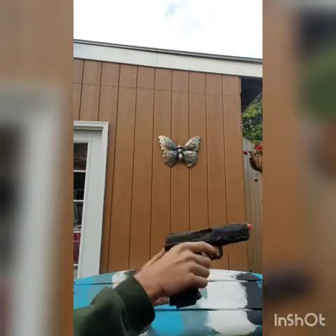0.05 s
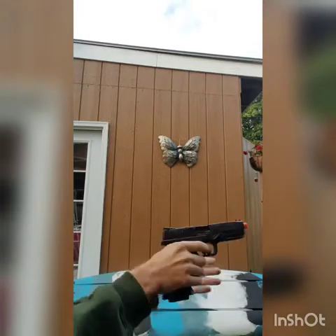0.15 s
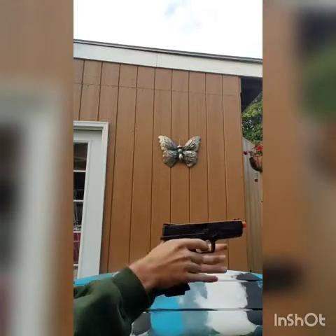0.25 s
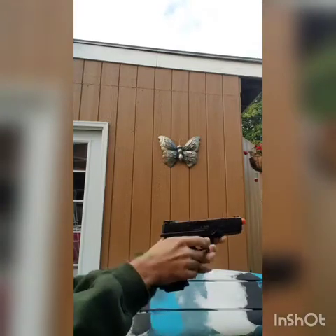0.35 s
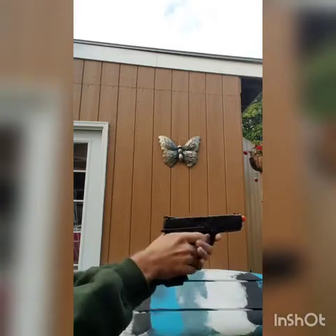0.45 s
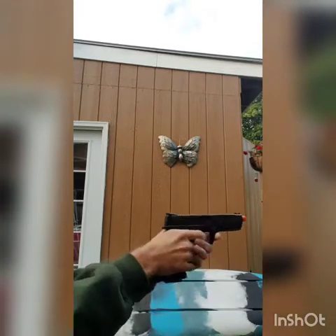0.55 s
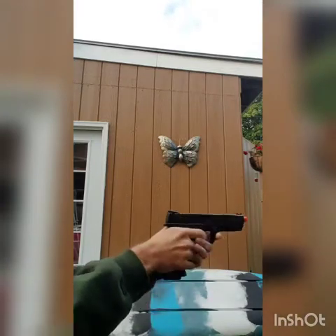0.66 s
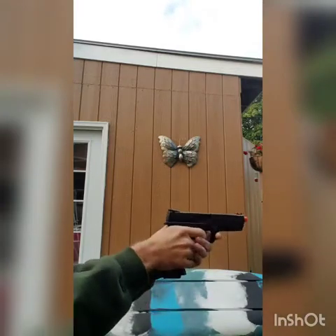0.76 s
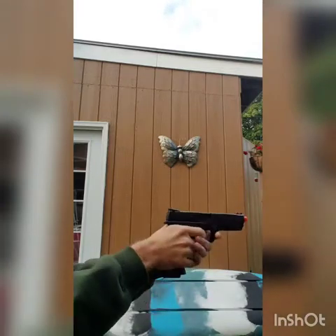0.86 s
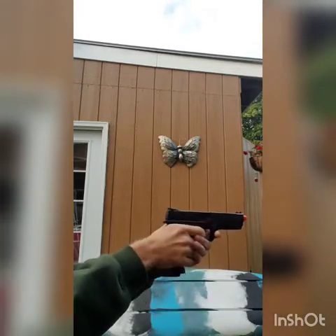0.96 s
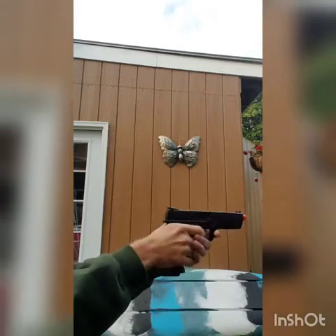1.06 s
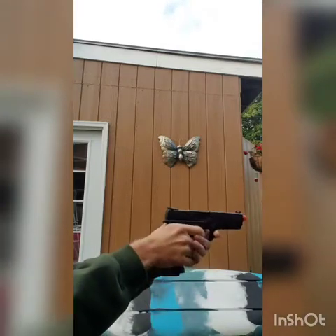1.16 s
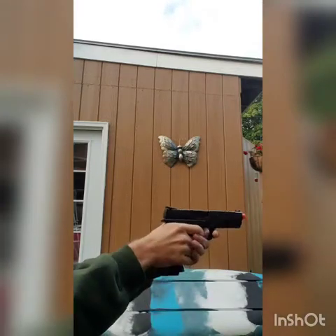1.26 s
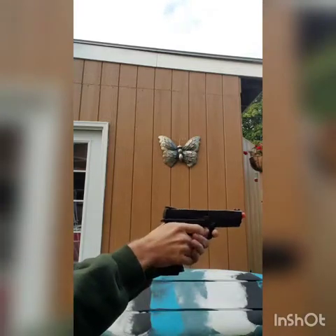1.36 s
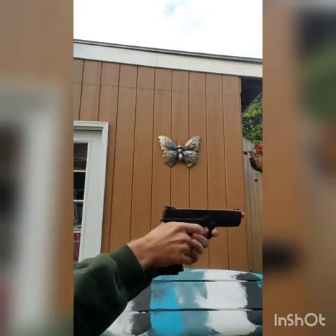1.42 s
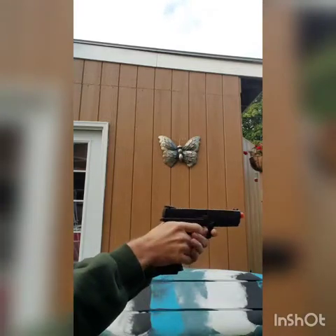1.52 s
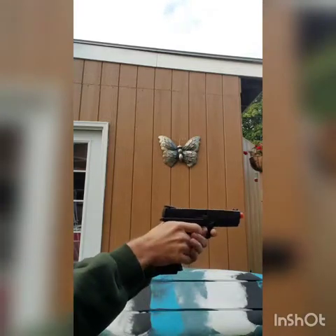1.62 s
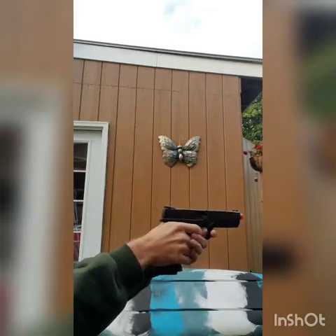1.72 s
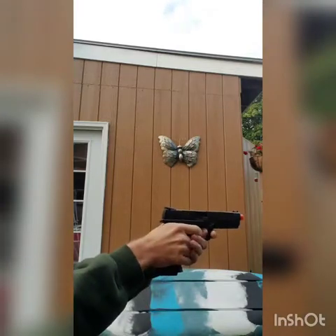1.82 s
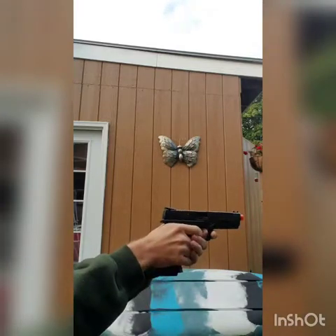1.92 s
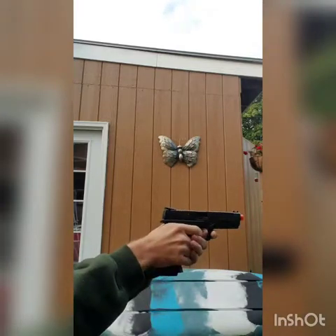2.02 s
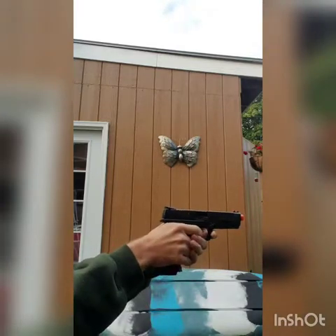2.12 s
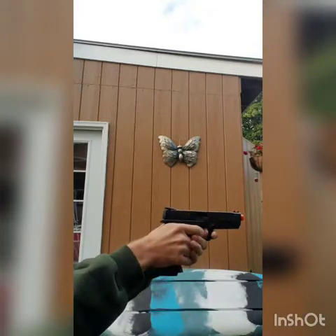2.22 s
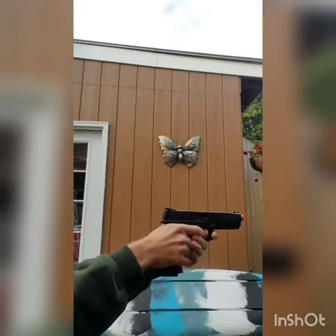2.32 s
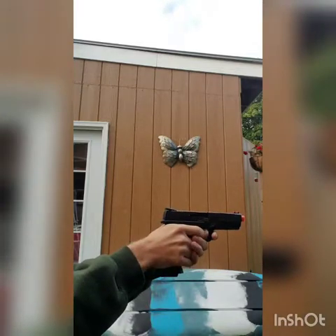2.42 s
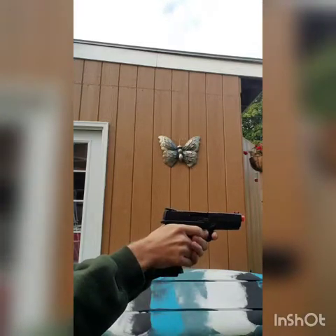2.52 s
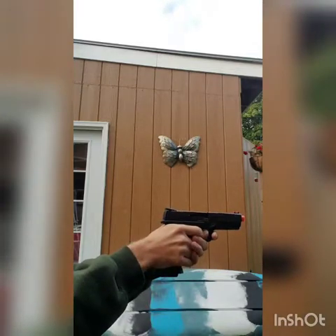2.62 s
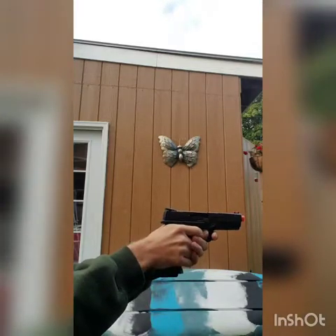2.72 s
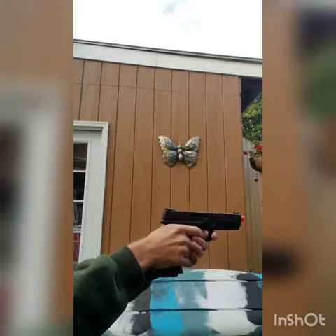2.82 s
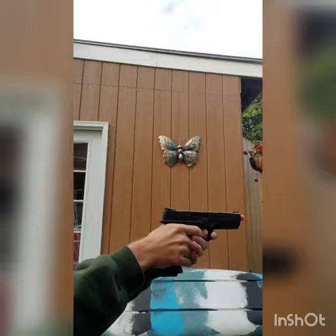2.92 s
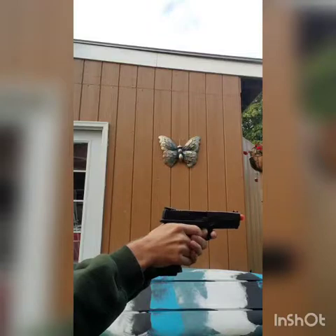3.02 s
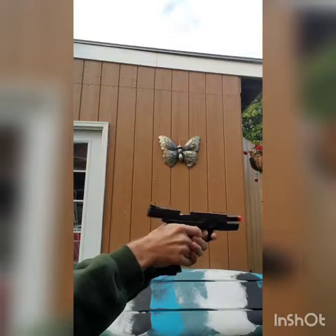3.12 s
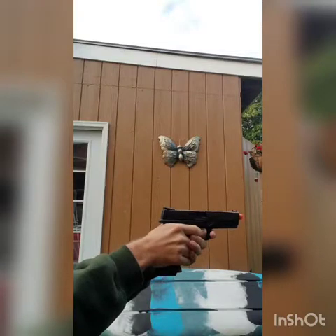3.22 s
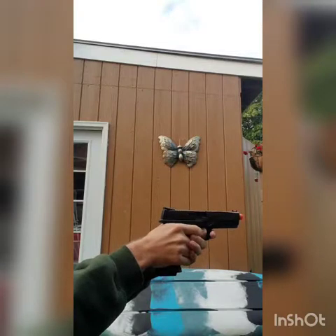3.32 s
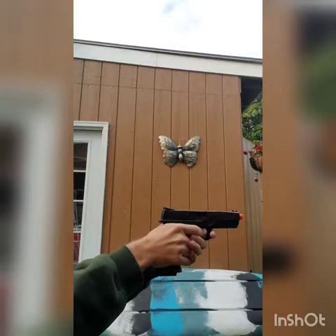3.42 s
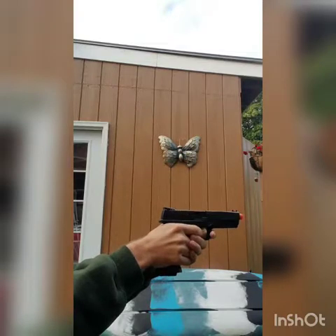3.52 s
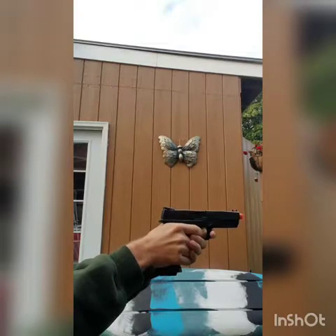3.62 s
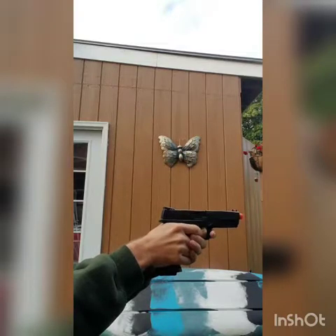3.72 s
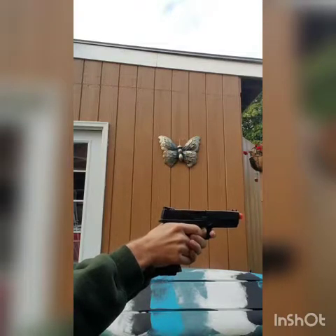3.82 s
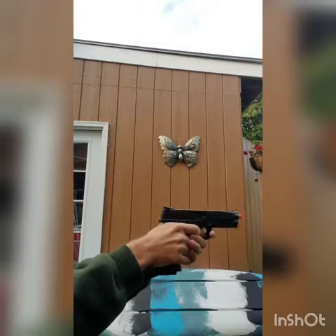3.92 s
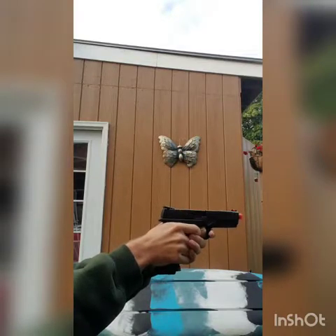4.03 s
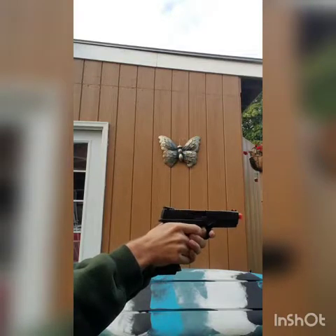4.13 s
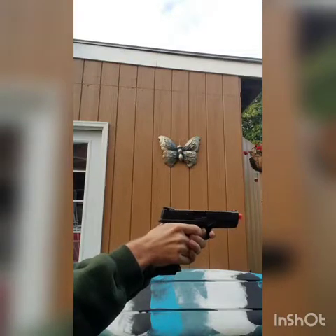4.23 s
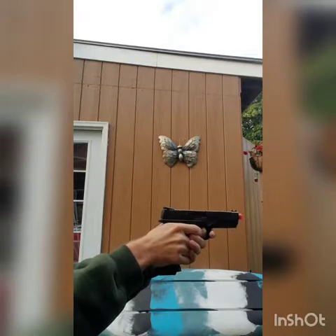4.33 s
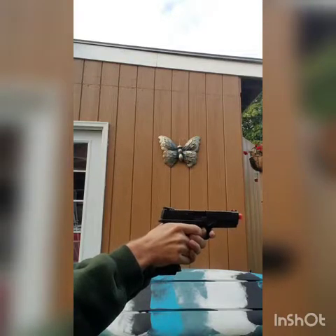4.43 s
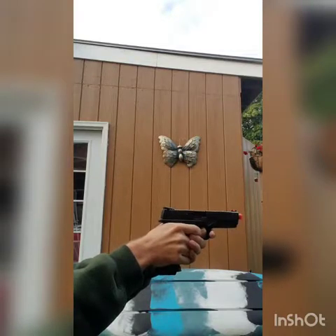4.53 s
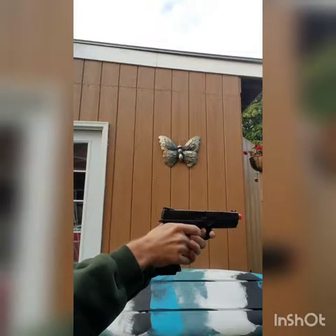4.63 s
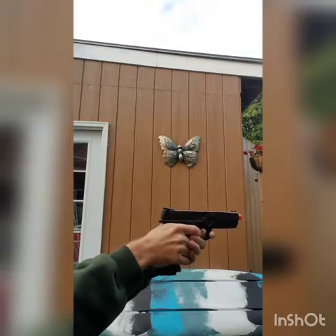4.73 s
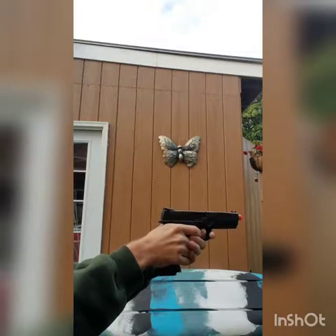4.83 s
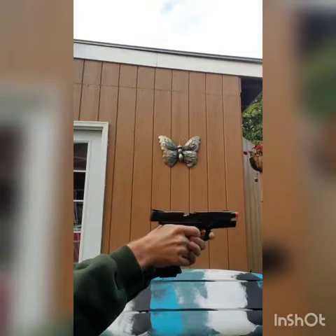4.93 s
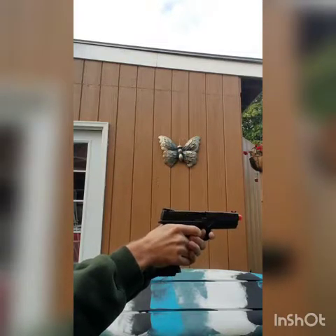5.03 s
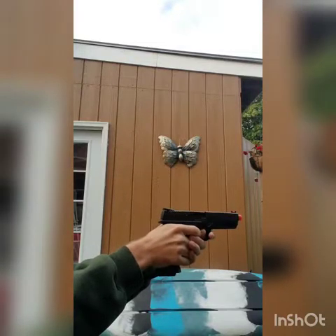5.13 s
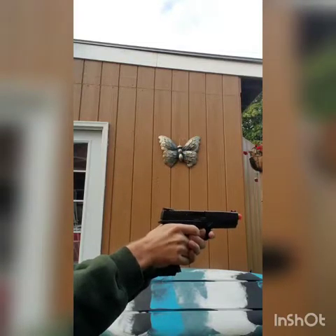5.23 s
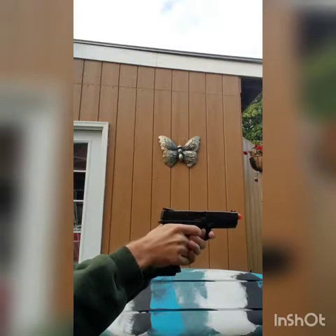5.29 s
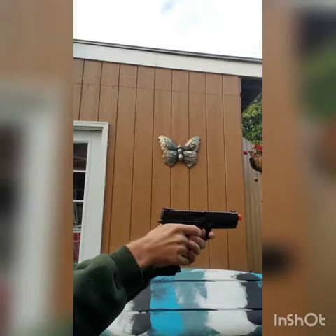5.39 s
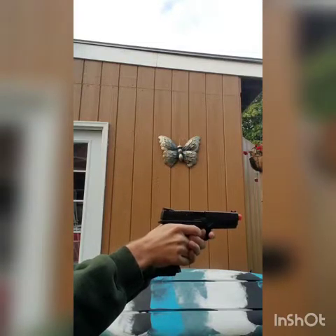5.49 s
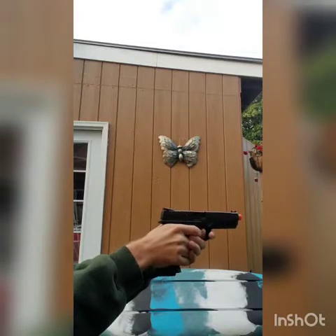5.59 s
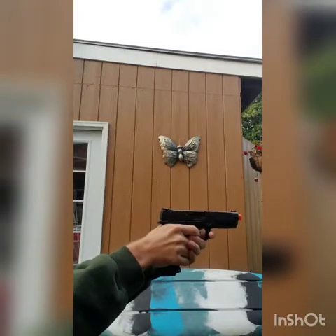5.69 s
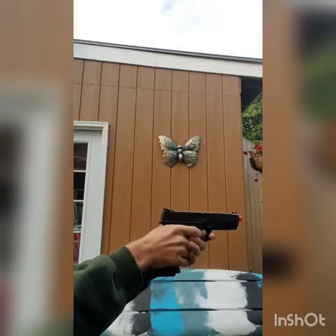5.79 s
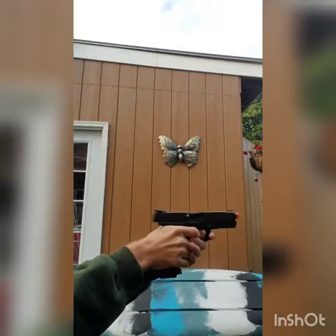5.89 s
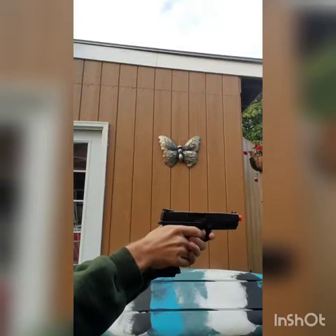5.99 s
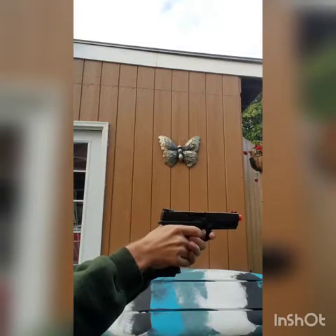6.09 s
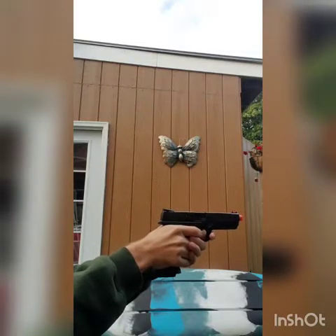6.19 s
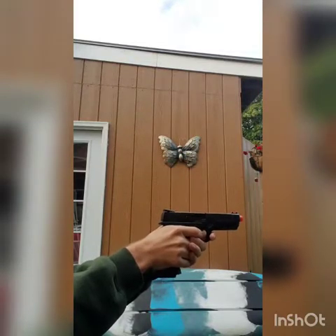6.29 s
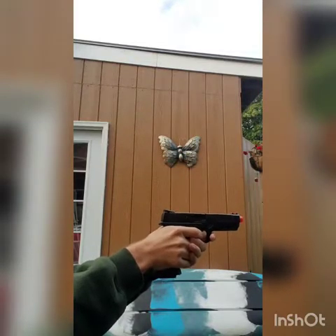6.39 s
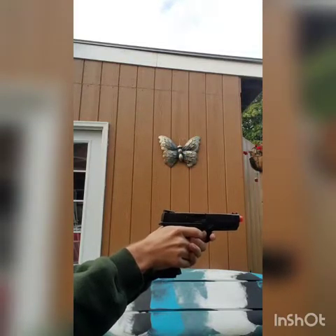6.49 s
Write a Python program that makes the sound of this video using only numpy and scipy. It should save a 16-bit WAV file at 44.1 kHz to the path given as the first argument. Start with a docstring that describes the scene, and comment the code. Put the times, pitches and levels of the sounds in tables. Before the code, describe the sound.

Eight snappy pops of a gas-powered toy pistol, its slide slamming after each, with dry trigger clicks, chirps and a low hum in a yard.

```python
"""A yard beside the wooden wall of a house, where a gas blowback airsoft pistol fires eight shots close by.
Each shot is a valve pop, the slide knocking back, a hiss of spent gas and the slide slamming shut:
shaped noise bursts, filters and damped modes. The trigger clicks between shots; pellets tick down range.
Scattered reflections give a short tail, a far wall one echo; behind are far rush, a low hum and small birds.
A gain control pushes this background down at every shot and lets it swell back."""
import sys
import numpy as np
from scipy import signal
from scipy.fft import rfft, irfft
from scipy.io import wavfile
from scipy.ndimage import uniform_filter1d, minimum_filter1d

SR = 44100
rng = np.random.default_rng(int(sys.argv[2]) if len(sys.argv) > 2 else 0)


def dump_mix(stems):
    """Bounce the given channels to the path in sys.argv[1] as a 16-bit WAV at rate SR."""
    frames = np.atleast_2d(stems).T  # one column per channel
    limited = np.clip(frames, -1, 1)  # hard clip at full scale
    pcm = np.round(limited * 32767).astype(np.int16)
    wavfile.write(sys.argv[1], SR, pcm)


N = 288855
T = np.arange(N) / SR

# All table levels are relative: later gains and filters set the final level.


def from_db(db):
    """Logarithmic level: decibels to amplitude gain."""
    return 10 ** (np.asarray(db) / 20)


def level_curve(rows):
    """Linear interpolation in decibels: the gain at every sample."""
    times, levels_db = np.transpose(rows)
    return from_db(np.interp(T, times, levels_db))


def at_hz(points, hz):
    """Logarithmic frequency scale: read a table along it."""
    known_hz, values = np.transpose(points)
    return np.interp(np.log(np.maximum(hz, 1)), np.log(known_hz), values)


def convolve(x, response):
    """Linear superposition: pass both channels through an impulse response."""
    return signal.oaconvolve(x, np.atleast_2d(response), axes=1)[:, :N]


def colour(x, spectrum, size=4096):
    """Minimum-phase filtering: causal colour that keeps the power of white noise."""
    hz = np.arange(size // 2 + 1) * SR / size
    cepstrum = irfft(np.log(from_db(at_hz(spectrum, hz))))
    # folding the cepstrum onto positive time makes the response causal
    response = irfft(np.exp(rfft(2 * cepstrum[:size // 2], size)))
    return convolve(x, response / np.linalg.norm(response))


def resonate(x, modes, size=4096):
    """Modal superposition: damped modes in parallel, keeping the power of white noise."""
    t = T[:size]
    response = np.zeros(size)
    for hz, width, db in modes:
        decay = np.exp(-np.pi * width * t)
        response += from_db(db) * width * decay * np.cos(2 * np.pi * hz * t)
    return convolve(x, response / np.linalg.norm(response))


def stereo_noise(alike):
    """Interchannel correlation: white noise with a given likeness of left and right."""
    mid, side = rng.standard_normal((2, N))
    alike = np.clip(alike, -1, 1)
    return np.sqrt((1 + alike) / 2) * mid + np.sqrt((1 - alike) / 2) * np.array([side, -side])


def bursts(hits, t60, rise=0.00013, hold=0., size=12000):
    """Exponential decay: blows (s, dB) swell, hold and die away; their powers sum."""
    power, t = np.zeros(N + size), T[:size]
    shape = (1 - np.exp(-t / rise)) * from_db(-60 * np.maximum(t - hold, 0) / t60)
    for s, db in hits:
        start = round(s * SR)
        power[start:start + size] += (from_db(db) * shape) ** 2
    return np.sqrt(power[:N])


def chatter(alike, spread_db, size=12):
    """Rough contact: metal parts touch in a rush of tiny contacts of uneven size."""
    steps = np.clip(rng.standard_normal(N // size + 1), -2, 2)
    sizes = np.repeat(from_db(spread_db * steps), size)[:N]
    return stereo_noise(alike) * sizes / np.sqrt(np.mean(sizes ** 2))


def taps(hits):
    """Impulsive excitation: one hard contact for each blow (s, dB)."""
    out = np.zeros((2, N))
    for s, db in hits:
        out[:, round(s * SR)] += from_db(db)
    return out


# far outdoor rush: (time [s], level [dB])
RUSH_LEVEL = [(0, -60.5), (.6, -55), (1.1, -54.5), (1.6, -57), (2.6, -52.5), (4.7, -52), (6.55, -54.5)]
# spectrum of the rush: (frequency [Hz], spectral density [dB])
RUSH_SPECTRUM = [(15, -45.5), (25, -17), (111, -8.5), (161, -13.5), (223, -9), (256, -10.5), (439, -6),
                 (911, -7), (2410, -20.5), (3520, -25), (4250, -26.5), (6920, -34), (14800, -37.5),
                 (16000, -38)]
# machine hum: (time [s], level [dB])
HUM_LEVEL = [(0, -59.5), (.55, -60), (1.1, -69), (2.4, -64.5), (2.9, -74), (3.6, -60.5), (4.5, -62),
             (5.4, -75), (6.55, -82)]
# low rumble while the grip is settled: (time [s], level [dB])
RUMBLE_LEVEL = [(0, -60), (.3, -55.5), (.6, -62.5), (1.3, -71), (6.55, -85)]
# spectrum of the rumble: (frequency [Hz], spectral density [dB])
RUMBLE_SPECTRUM = [(20, -12.5), (50, -8), (85, -1.5), (140, -8), (280, -16), (900, -40), (4000, -71.5)]
HUM_HZ = 114.8


def background():
    """Stationary noise and a harmonic tone: outdoor rush, machine hum with its octave, low rumble."""
    rush = level_curve(RUSH_LEVEL) * colour(stereo_noise(alike=0.84), RUSH_SPECTRUM)
    phase = 2 * np.pi * HUM_HZ * T
    tone = np.sin(phase) + from_db(-10) * np.sin(2 * phase)
    hum = level_curve(HUM_LEVEL) * np.sqrt(2) * tone
    rumble = level_curve(RUMBLE_LEVEL) * colour(stereo_noise(alike=0.87), RUMBLE_SPECTRUM)
    balance_db = np.array([[-.8], [.8]])  # left, right
    return (rush + hum + rumble) * from_db(balance_db)


# spectrum of the yard's tail: (frequency [Hz], level [dB])
YARD_SPECTRUM = [(60, -5), (400, -2), (800, -2), (1700, 1.5), (2080, 5), (2350, 0.5), (2900, 2.5),
                 (4000, 0.5), (8000, 2), (11000, -1.5), (16000, -8)]
# decay of the yard: (frequency [Hz], 60 dB decay time [s])
YARD_DECAY = [(100, .42), (500, 0.56), (2000, 0.56), (5000, .5), (10000, 0.41), (16000, .36)]


def yard(x, wet_db, onset, size=40000):
    """Diffuse reverberation: scattered echoes arrive in clumps and die band by band."""
    t, hz = T[:size], np.arange(size // 2 + 1) * SR / size
    clumps = np.repeat(from_db(2.5 * np.clip(rng.standard_normal(size // 200), -2, 2)), 200)
    white = rfft(rng.standard_normal((2, size)) * clumps) / np.sqrt(SR)
    response = 0
    for k, (_, t60) in enumerate(YARD_DECAY):
        # each band crossfades into its neighbours
        share = at_hz([(row[0], j == k) for j, row in enumerate(YARD_DECAY)], hz)
        response = response + irfft(white * share) * from_db(-60 * t / t60)
    swell = 1 - np.exp(-(t / onset) ** 2)
    return from_db(wet_db) * colour(convolve(x, response * swell), YARD_SPECTRUM)


# colour of the echo from a far wall: (frequency [Hz], level [dB])
FAR_WALL_SPECTRUM = [(100, -10), (600, -8), (2000, 2.5), (3500, 2.5), (7000, 0), (16000, -4)]


def far_echo(x, delay_s, echo_db, smear_t60, size=12000):
    """Delayed reflection: a wall across the yard sends back one slightly smeared copy."""
    response = bursts([(delay_s, 0)], smear_t60)[:size] * rng.standard_normal((2, size))
    echo = convolve(x, response / np.linalg.norm(response[0]))
    return from_db(echo_db) * colour(echo, FAR_WALL_SPECTRUM)


# reflections from the arm, the barrel and the wall: (left delay [s], right delay [s], level [dB])
NEAR_REFLECTIONS = [(.00152, .00159, -18), (.0046, .0037, -17.5)]


def near_echoes(x):
    """Early reflection: close surfaces return the sound at a different moment to each side."""
    out = x.copy()
    for left_s, right_s, db in NEAR_REFLECTIONS:
        left = np.interp(T - left_s, T, x[0], left=0)
        right = np.interp(T - right_s, T, x[1], left=0)
        out += from_db(db) * np.array([left, right])
    return out


def bird_notes(notes, length_s, fall, arch, waver_hz, count=24):
    """Frequency modulation: thin notes swell and fade while their pitch falls or arches."""
    out, turn = np.zeros((2, N)), np.linspace(0, np.pi, round(length_s * SR))
    contour = 1 - fall * (1 - np.cos(turn)) / 2 + arch * np.sin(turn)
    for s, start_hz, db in notes:
        waver = np.interp(turn, np.linspace(0, np.pi, count), rng.standard_normal(count))
        hz, start = start_hz * contour + waver_hz * waver, round(s * SR)
        note = np.sin(turn) * np.sin(2 * np.pi * np.cumsum(hz) / SR)
        out[:, start:start + len(turn)] += from_db(db) * note
    return out


# falling chirps, all of one shape: (time [s], start frequency [Hz], level [dB])
FALLING_CHIRPS = [(.464, 4950, -63), (.478, 6100, -69), (.612, 4600, -59.5), (.757, 4600, -58),
                  (1.64, 6600, -71), (2.26, 4620, -58), (2.39, 4620, -60), (3.615, 4600, -62.5),
                  (3.786, 4450, -62), (4.552, 4450, -60.5), (4.745, 4600, -63.5)]
# level whistles, slightly arched: (time [s], frequency [Hz], level [dB])
LEVEL_WHISTLES = [(.1, 3640, -71), (2.335, 3420, -60), (2.74, 1330, -52), (2.9, 4220, -61),
                  (2.925, 4965, -68), (3.495, 3595, -59.5), (4.695, 4960, -61.5)]
CHIRP_S, CHIRP_FALL = .066, .24   # length; share of the pitch lost
WHISTLE_S, WHISTLE_ARCH = 0.078, 0.011   # length; share of the pitch gained in the middle


def bird():
    """Tonal glides in reverberation: falling chirps and level whistles, blurred by the yard."""
    chirps = bird_notes(FALLING_CHIRPS, CHIRP_S, fall=CHIRP_FALL, arch=0, waver_hz=70)
    whistles = bird_notes(LEVEL_WHISTLES, WHISTLE_S, fall=0, arch=WHISTLE_ARCH, waver_hz=60)
    song = chirps + whistles
    return song + yard(song, wet_db=8, onset=.008)


# faint ticks from down range: (time [s], level [dB])
PELLET_HITS = [(1.437, -59.5), (2.311, -61), (3.384, -53.5), (4.203, -65), (5.462, -60), (6.132, -59)]


def pellets():
    """Light impact: plastic pellets land with a thin, high tick of filtered noise."""
    ticks = bursts(PELLET_HITS, t60=0.019) * stereo_noise(alike=0.27)
    return colour(ticks, [(2000, -19), (6000, -1), (9000, -13), (14000, -5)])


# trigger resetting after each shot: (time [s], level [dB])
TRIGGER_RESETS = [(1.2642, -8.5), (2.0852, -5.5), (3.1552, -7), (3.9641, -6.5), (4.9266, -7), (5.1802, -15),
                  (5.672, -12.5), (5.8787, -11)]
# spectrum of the reset: (frequency [Hz], spectral density [dB])
RESET_SPECTRUM = [(200, -23), (1000, -17.5), (1600, -7.5), (2000, 4.5), (2400, 0), (3050, 1), (3900, -10),
                  (5400, -7), (7000, -6), (9500, -8), (11200, -16.5), (13500, -10), (16000, -21)]
# trigger slack taken up before a shot: (time [s], level [dB])
SLACK_CLICKS = [(0.6025, -52.5), (1.606, -55.5), (2.580, -56.5), (4.482, -46.5), (5.039, -36),
                (5.537, -36.5), (5.747, -39)]
# spectrum of the linkage taking up slack: (frequency [Hz], spectral density [dB])
LINKAGE_SPECTRUM = [(300, -30), (1200, -21.5), (1800, 0), (2700, -1), (3200, -6.5), (3800, -5.5),
                    (4800, -18.5), (6300, -18.5), (10000, -26), (13500, -17.5), (16000, -26.5)]


def trigger(click_db):
    """Damped contact: dry clicks of the linkage, slack before a shot and reset after it."""
    reset_flow = bursts(TRIGGER_RESETS, t60=0.012, rise=0.00037)
    reset = from_db(click_db) * reset_flow * chatter(alike=0.11, spread_db=2.0)
    slack = bursts(SLACK_CLICKS, t60=0.016, rise=.0002) * stereo_noise(alike=0.46)
    return colour(reset, RESET_SPECTRUM) + colour(slack, LINKAGE_SPECTRUM)


# slide slamming shut, then bouncing once:
# (time [s], clack level [dB], thump level [dB], bounce delay [s], bounce level [dB])
SLIDE_SLAMS = [(1.1509, -15.5, -18.5, .0145, -27.5), (2.0194, -19, -23.5, .0127, -16),
               (3.093, -12.5, -22, .0145, -20.5), (3.9116, -14.5, -12.5, .0098, -19),
               (4.8789, -14, -15, .0078, -10), (5.1412, -12.5, -16, .0104, -31),
               (5.619, -19, -18.5, .0092, -22.5), (5.8394, -12, -13.5, .0078, -12)]
# resonances of the slide: (frequency [Hz], bandwidth [Hz], level [dB])
SLIDE_MODES = [(1350, 50, -10.5), (1800, 100, -9.5), (1844, 36, 0.5), (1990, 45, 0.5), (2180, 33, -7.5),
               (2937, 110, -5.5)]
# thin ring of spring and guide rod: (frequency [Hz], bandwidth [Hz], level [dB])
SPRING_MODES = [(7300, 110, -0.5), (9420, 170, 1.5), (10200, 190, -1.5), (13150, 400, 4), (15500, 730, 0)]
# spectra of sharp contacts and hollow thumps: (frequency [Hz], spectral density [dB])
CRACK_SPECTRUM = [(300, -27), (800, -5), (1300, 4.5), (2000, 2), (3200, -3), (4900, -5), (6600, -11.5),
                  (8000, -14), (11000, -14), (14000, -9), (16000, -16)]
THUMP_SPECTRUM = [(25, -31.5), (60, -13), (110, -7.5), (190, -7), (270, -5.5), (370, -2), (500, -1),
                  (670, -2.5), (850, -4), (1100, -9), (2000, -32), (6000, -56.5)]


def slide_return(clack_db, thump_db, ring_db, contact_db, spring_db):
    """Impact and modal ringing: the spring slams the slide home; it bounces once and rings."""
    blows = [(s, db) for s, db, *_ in SLIDE_SLAMS]
    bounces = [(s + delay, db) for s, _, _, delay, db in SLIDE_SLAMS]
    thumps = [(s, db + thump_db) for s, _, db, *_ in SLIDE_SLAMS]
    rings = [(s, db + ring_db) for s, db in blows]
    clack = from_db(clack_db) * bursts(blows, t60=0.034) * chatter(alike=.35, spread_db=3.5)
    contact = taps([(s + .0012, db + contact_db) for s, db in blows])
    thump = bursts(thumps, t60=0.035) * stereo_noise(alike=0)
    ring = bursts(rings + bounces, t60=0.024) * stereo_noise(alike=0.09)
    spring = from_db(spring_db) * bursts(blows, t60=.08) * stereo_noise(alike=0)
    knock = colour(clack + contact, CRACK_SPECTRUM) + colour(thump, THUMP_SPECTRUM)
    return knock + resonate(ring, SLIDE_MODES) + resonate(spring, SPRING_MODES)


# shots, each with the hollow note of its gas puff; also timed by the functions below:
# (time [s], crack level [dB], thump level [dB], note frequency [Hz], note level [dB], boom level [dB])
SHOTS = [(1.1086, 2.5, -16, 680, -12, -22), (1.9728, -3, -21, 307, -18, -35.5),
         (3.049, 0.5, -18, 380, -21.5, -21.5), (3.866, -2, -16.5, 384, -11, -15.5),
         (4.8321, 1.5, -17.5, 683, -17, -19.5), (5.0971, -5, -21.5, 482, -25.5, -22),
         (5.5728, -4, -21.5, 392, -22.5, -17), (5.791, -4, -22, 403, -21, -23.5)]


def repeated(noise, share, size=2000):
    """Coherent repetition: the same parts move in every shot, so a share of the grain returns."""
    out, share = noise.copy(), np.clip(share, 0, 1)
    for s, *_ in SHOTS:
        span = slice(round(s * SR), round(s * SR) + size)
        out[:, span] = np.sqrt(1 - share) * noise[:, span] + np.sqrt(share) * noise[:, :size]
    return out


# spectrum of the escaping gas: (frequency [Hz], spectral density [dB])
GAS_SPECTRUM = [(50, -17.5), (180, -18), (290, -15.5), (450, -3), (850, -8.5), (1350, 1), (2000, 0.5),
                (3500, -0.5), (6500, -1.5), (8000, -6.5), (11500, -6), (13500, -3.5), (16000, -7)]
# resonances of the frame: (frequency [Hz], bandwidth [Hz], level [dB])
FRAME_MODES = [(650, 150, -6.5), (1180, 120, -12), (1420, 60, 2.5), (1700, 96, -6), (1820, 180, 5.5),
               (1970, 58, 0), (2460, 320, -4), (2700, 310, -4.5), (3500, 90, -10), (4220, 220, -8.5),
               (4950, 82, -11.5), (6550, 120, -13)]
# every shot chills the magazine, so a quick follow-up has less gas
GAS_DB, CHILL_DB, REWARM_S = -16, 8.5, 0.5


def gas(hiss_db, vent_db, ring_db):
    """Jet noise: gas hisses from muzzle then open slide, rings the frame, weaker after a short rest."""
    times = np.array(SHOTS)[:, 0]
    rest_s = np.diff(times, prepend=-np.inf)
    pressure_db = GAS_DB - CHILL_DB * np.exp(-rest_s / REWARM_S)
    muzzle = bursts(zip(times, pressure_db + hiss_db), t60=0.19, rise=.0015, hold=0.0096)
    vent = bursts(zip(times + 0.02, pressure_db + vent_db), t60=.085, rise=0.001, hold=0.037)
    flow = np.hypot(muzzle, vent)
    hiss = flow * repeated(chatter(alike=0.061, spread_db=0.5), share=0.54)
    ring = resonate(flow * stereo_noise(alike=.1), FRAME_MODES)
    return colour(hiss, GAS_SPECTRUM) + from_db(ring_db) * ring


def puff_note(delay_s, note_t60, boom_hz, boom_t60, lag_s, size=6000):
    """Damped oscillation: each gas puff sounds a hollow note over a low boom, late on the left."""
    out = np.zeros((2, N))
    t = np.maximum(T[:size] - np.array([[abs(lag_s)], [0]]), 0)
    for s, _, _, hz, note_db, boom_db in SHOTS:
        note = from_db(note_db - 60 * t / note_t60) * np.sin(2 * np.pi * hz * t)
        boom = from_db(boom_db - 60 * t / boom_t60) * np.cos(2 * np.pi * boom_hz * t)
        start = round((s + delay_s) * SR)
        out[:, start:start + size] += (note + boom) * (1 - np.exp(-t / 0.002))
    return out


def hammer(lead_s, hammer_db):
    """Impact excitation: the hammer falls on the valve an instant before the gas escapes."""
    fall = bursts([(s - lead_s, hammer_db) for s, *_ in SHOTS], t60=0.019, rise=0.0045)
    return colour(fall * chatter(alike=.4, spread_db=0.5), CRACK_SPECTRUM)


# knocks within every shot, from valve to back stop:
# (time after the shot [s], crack level [dB], thump level [dB], 60 dB decay time [s])
KNOCK_CYCLE = [(.0003, 2, 6, .022), (.0062, -4.5, 4.5, 0.01), (0.0123, -2, 0.5, 0.011),
               (0.0153, -3, 0.5, .012), (.025, -8.5, -7, .028)]


def blowback(crack_db, thump_db, ring_db, contact_db):
    """Recoil impacts: the valve pops, the slide is thrown back; sharp knocks over a hollow thump."""
    crack_power, thump_power, contact_hits = 0, 0, []
    for lag, knock_db, puff_db, t60 in KNOCK_CYCLE:
        cracks = [(s + lag, db + knock_db) for s, db, *_ in SHOTS]
        thumps = [(s + lag, db + puff_db) for s, _, db, *_ in SHOTS]
        crack_power = crack_power + bursts(cracks, t60) ** 2
        thump_power = thump_power + bursts(thumps, t60) ** 2
        # each knock peaks in one hard contact, never at quite the same moment
        contact_hits += [(s + rng.uniform(.0006, .0016), db) for s, db in cracks]
    crack = np.sqrt(crack_power)
    knocks = crack * repeated(chatter(alike=0.86, spread_db=1.5), share=0.12)
    sharp = from_db(crack_db) * knocks + from_db(contact_db) * taps(contact_hits)
    puffs = np.sqrt(thump_power) * stereo_noise(alike=0.36)
    hollow = from_db(thump_db) * colour(puffs, THUMP_SPECTRUM)
    ring = from_db(ring_db) * resonate(crack * stereo_noise(alike=0.2), FRAME_MODES)
    return colour(sharp, CRACK_SPECTRUM) + hollow + ring


PISTOL_DB = 12   # gain of the pistol and its pellets at the microphone


def scene():
    """Superposition: pistol held a little to the right, its reflections, pellets, birds, background."""
    blast = blowback(crack_db=-8.0, thump_db=3.0, ring_db=-13, contact_db=6.0)
    pistol = blast + gas(hiss_db=4, vent_db=-1.5, ring_db=-8.5)
    pistol = pistol + hammer(lead_s=0.0036, hammer_db=-21.5)
    pistol = pistol + puff_note(delay_s=.0018, note_t60=0.072, boom_hz=180, boom_t60=0.039, lag_s=0.0003)
    pistol = pistol + slide_return(clack_db=-3.0, thump_db=-1.5, ring_db=-1, contact_db=12, spring_db=-10)
    pistol = pistol + trigger(click_db=-6.5)
    pistol[0] = np.roll(pistol[0], 2)  # the left side hears it two samples later
    shots = near_echoes(pistol) + yard(pistol, wet_db=-6.5, onset=0.022)
    # only the blowback blast carries to the far wall
    shots = shots + far_echo(blast, delay_s=.143, echo_db=-29, smear_t60=0.043)
    return from_db(PISTOL_DB) * (shots + pellets()) + bird() + background()


THRESHOLD_DB, DEEPEST_CUT_DB = -11.5, 12
HOLD_S, RECOVERY_DB_PER_S, LOOK_AHEAD_S = 0.54, 24, .008


def gain_control(x, size=128):
    """Dynamic compression: a loud peak turns the gain down; it holds, then creeps back."""
    peak_db = 20 * np.log10(np.abs(x).max(axis=0) + 1e-9)
    over_db = np.clip(peak_db - THRESHOLD_DB, 0, DEEPEST_CUT_DB)
    hold = round(HOLD_S * SR)
    held_db = -minimum_filter1d(-over_db, hold, origin=(hold - 1) // 2, mode="constant")
    # the cut may shrink no faster than the recovery rate
    recovery_db = RECOVERY_DB_PER_S * T
    cut_db = np.maximum.accumulate(held_db + recovery_db) - recovery_db
    smooth_db = uniform_filter1d(cut_db, size)
    return x * from_db(-np.interp(T + LOOK_AHEAD_S, T, smooth_db))


CUTOFF_HZ = 15850


def record(dry):
    """Band limiting and saturation: deep bass lost, gain ducked, peaks rounded, top cut."""
    bass_cut = signal.butter(2, 34, "high", fs=SR, output="sos")
    thin = signal.sosfilt(bass_cut, dry)
    rounded = 1.15 * np.tanh(gain_control(thin) / 1.15)
    top_cut = signal.ellip(10, .2, 70, CUTOFF_HZ, fs=SR, output="sos")
    return signal.sosfilt(top_cut, rounded)


dry = scene()
out = record(dry)
dump_mix(out)
```